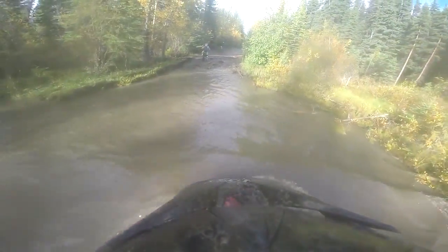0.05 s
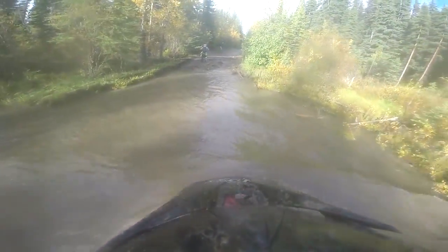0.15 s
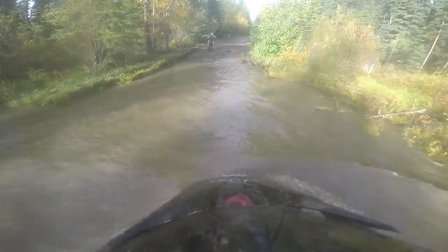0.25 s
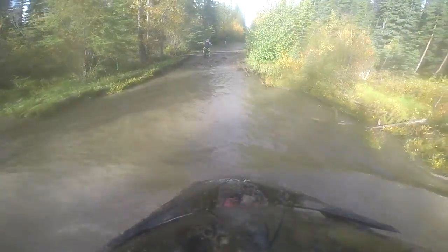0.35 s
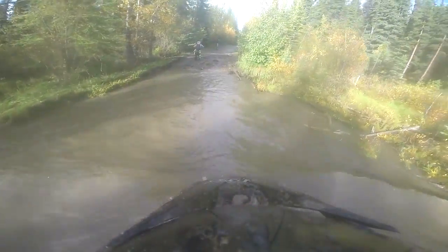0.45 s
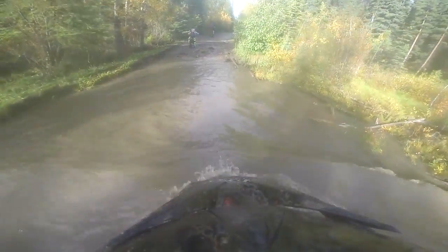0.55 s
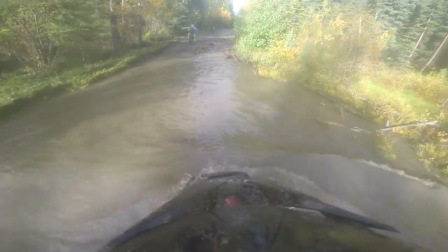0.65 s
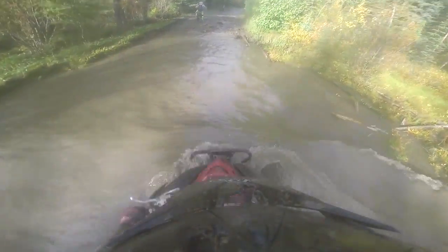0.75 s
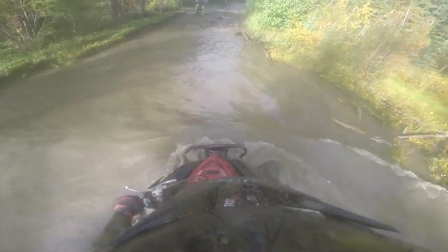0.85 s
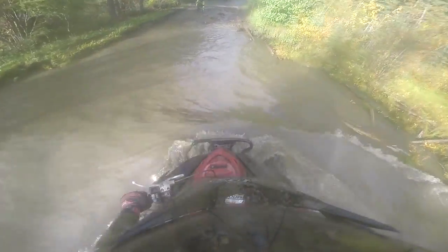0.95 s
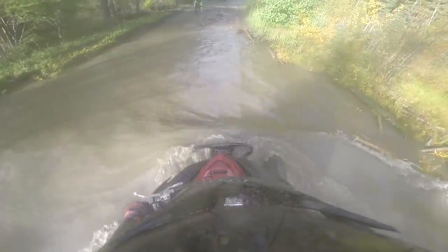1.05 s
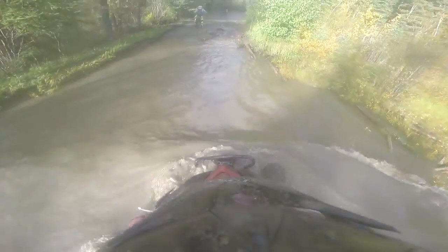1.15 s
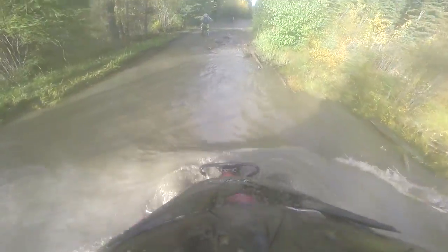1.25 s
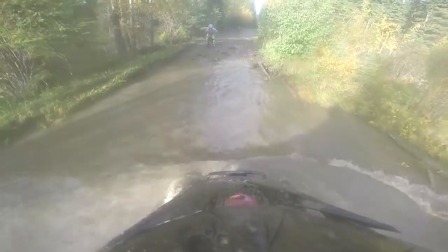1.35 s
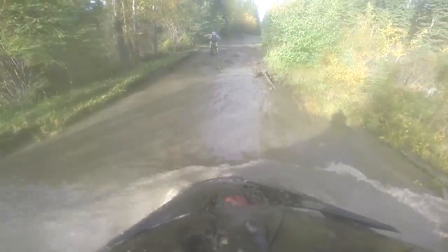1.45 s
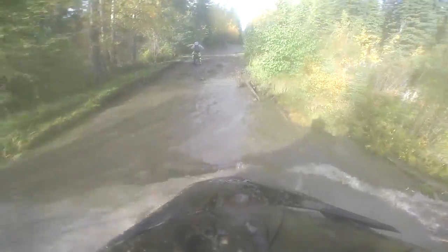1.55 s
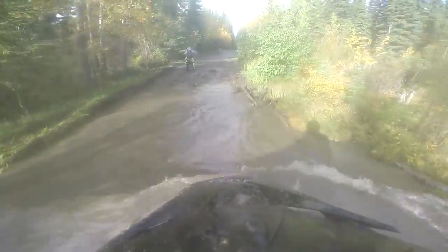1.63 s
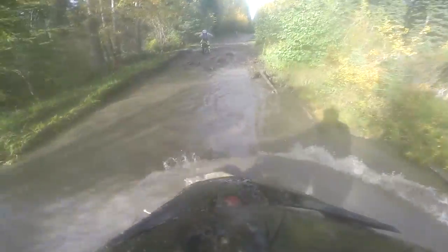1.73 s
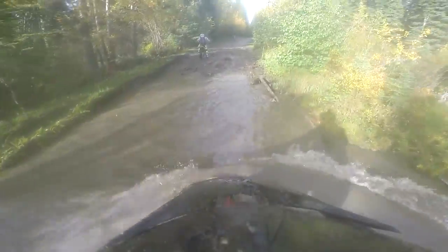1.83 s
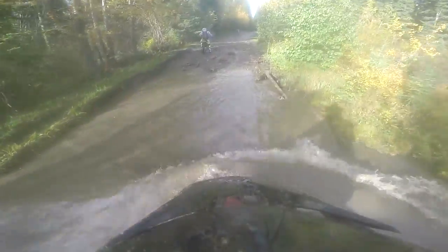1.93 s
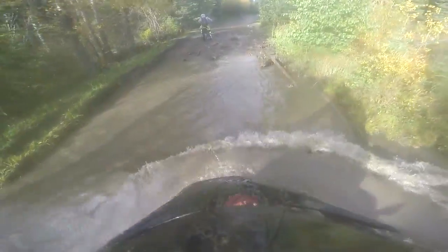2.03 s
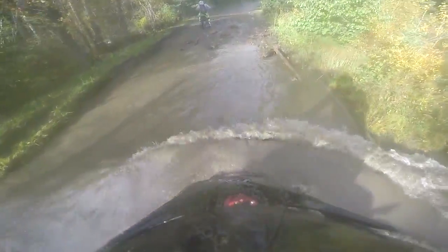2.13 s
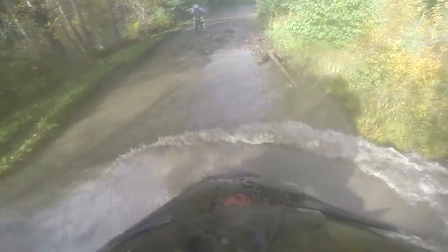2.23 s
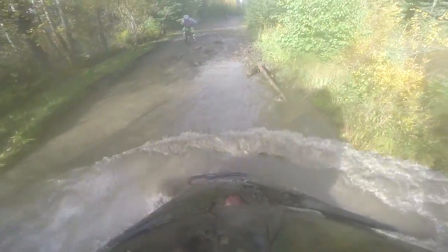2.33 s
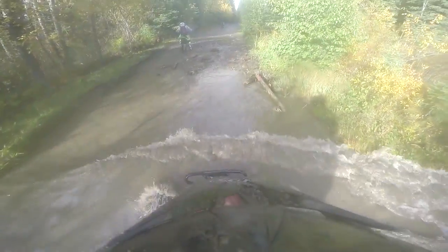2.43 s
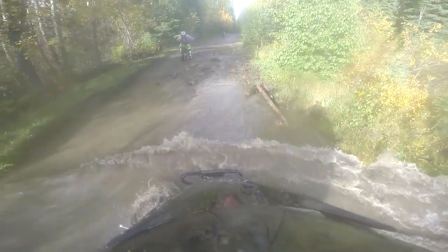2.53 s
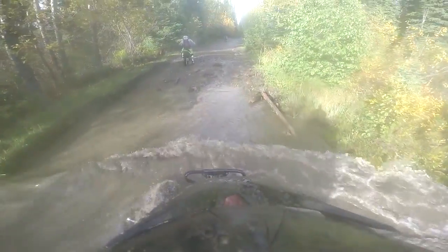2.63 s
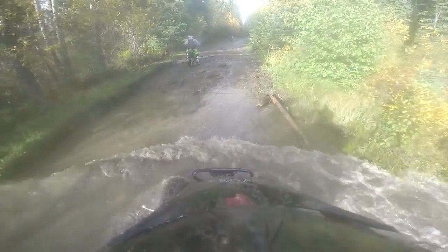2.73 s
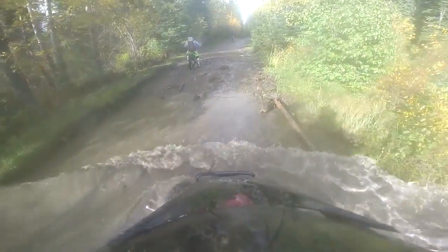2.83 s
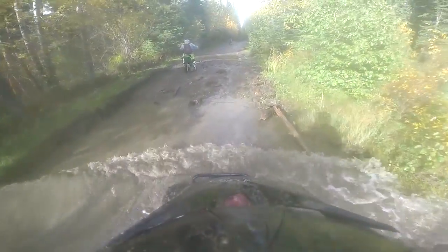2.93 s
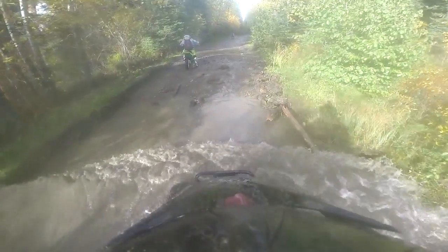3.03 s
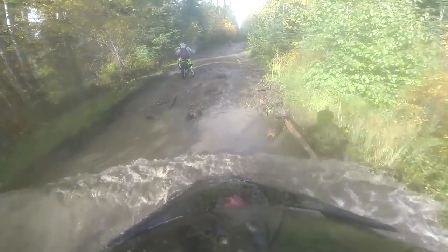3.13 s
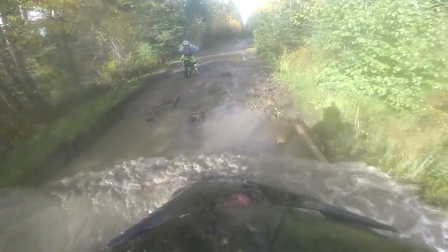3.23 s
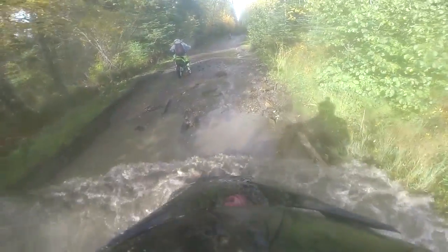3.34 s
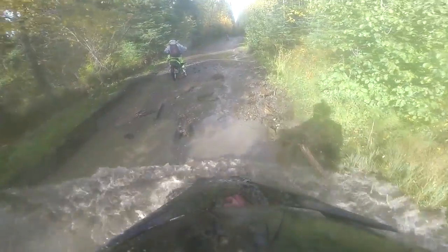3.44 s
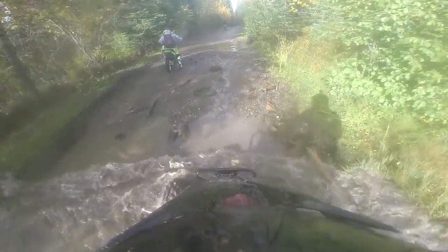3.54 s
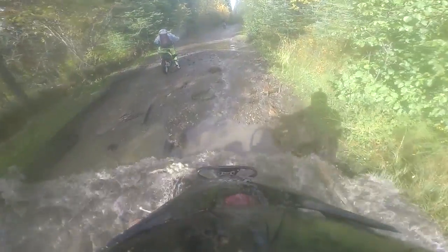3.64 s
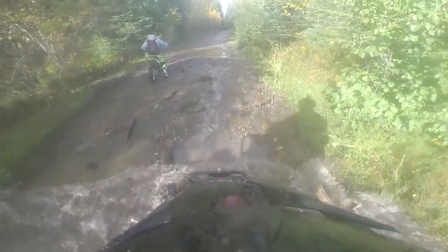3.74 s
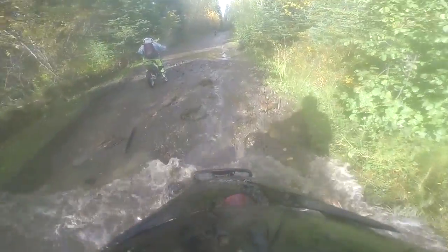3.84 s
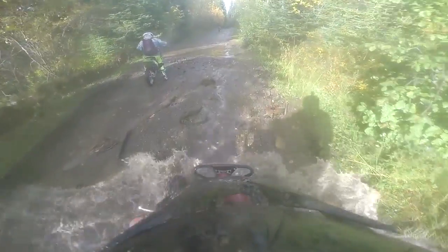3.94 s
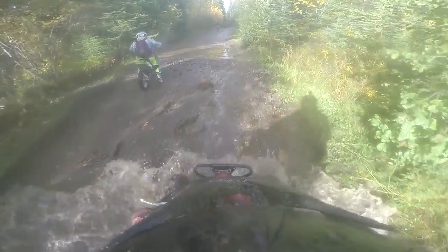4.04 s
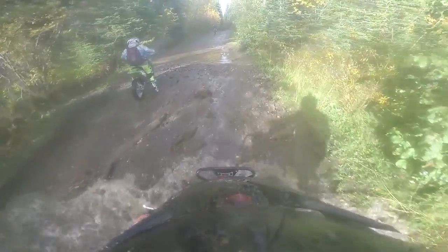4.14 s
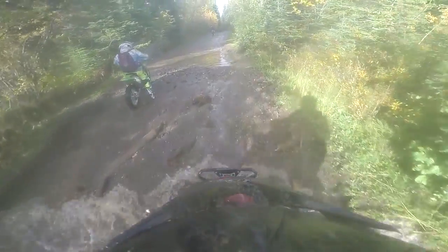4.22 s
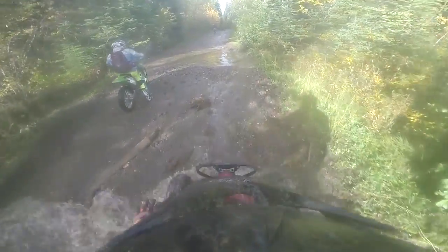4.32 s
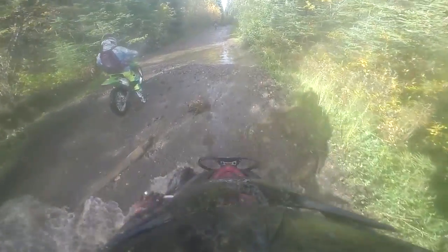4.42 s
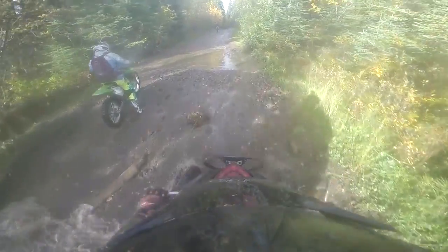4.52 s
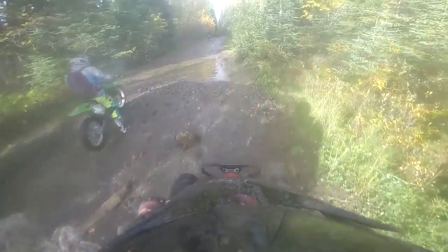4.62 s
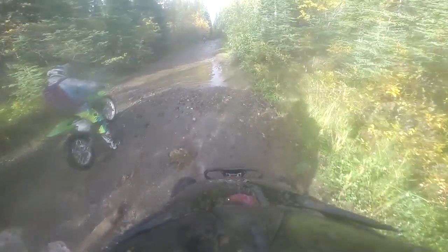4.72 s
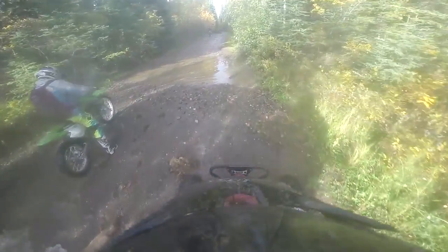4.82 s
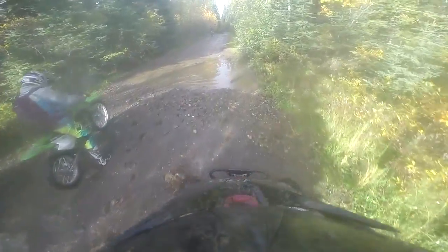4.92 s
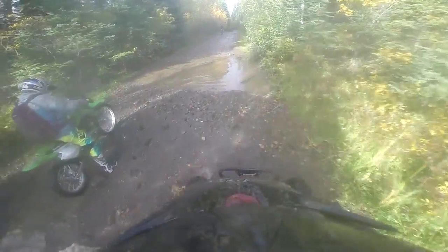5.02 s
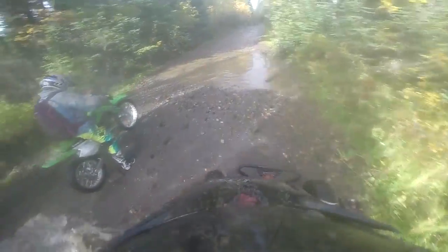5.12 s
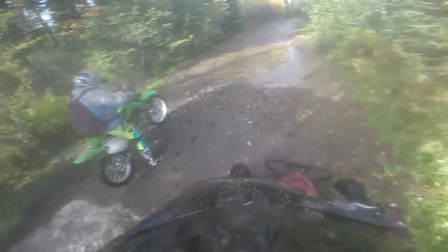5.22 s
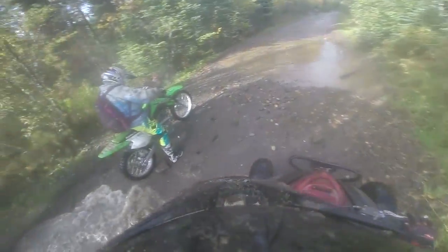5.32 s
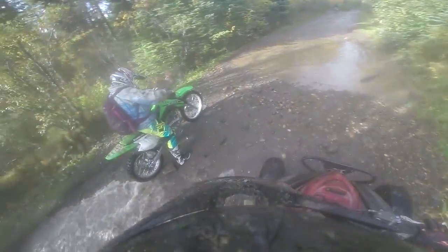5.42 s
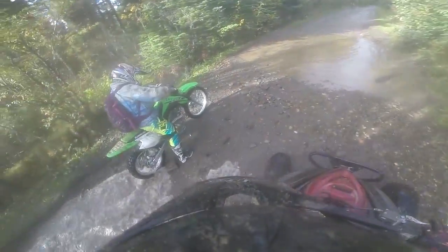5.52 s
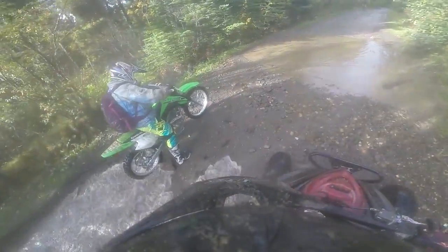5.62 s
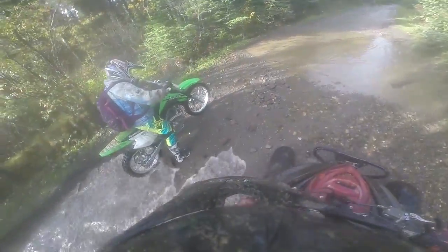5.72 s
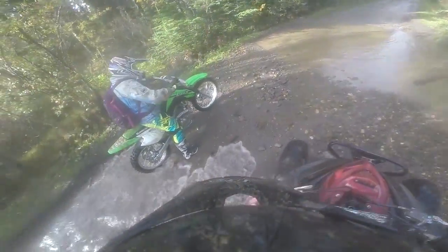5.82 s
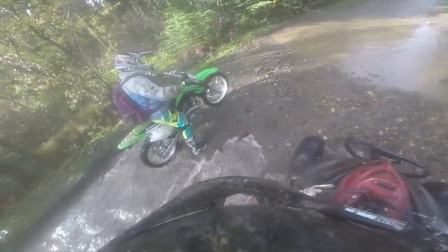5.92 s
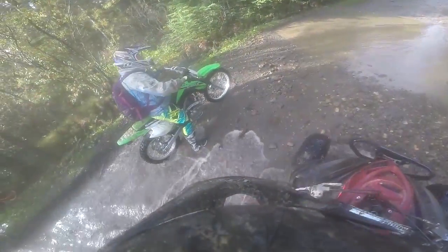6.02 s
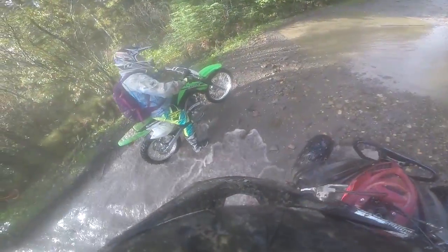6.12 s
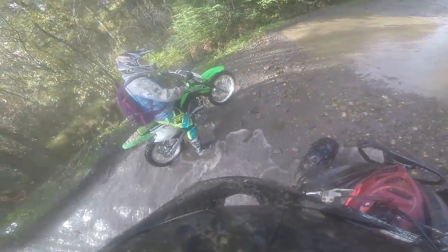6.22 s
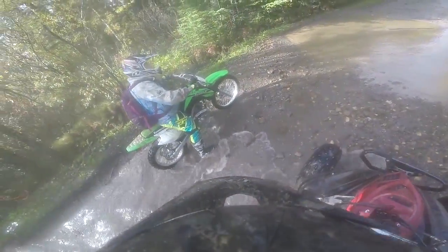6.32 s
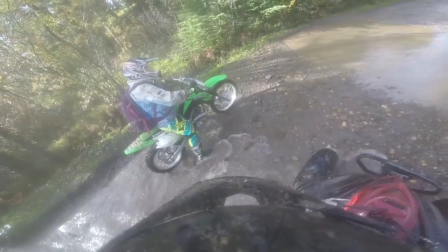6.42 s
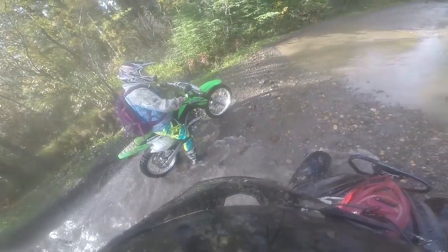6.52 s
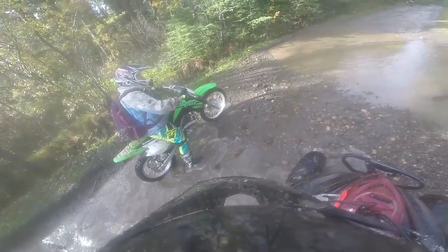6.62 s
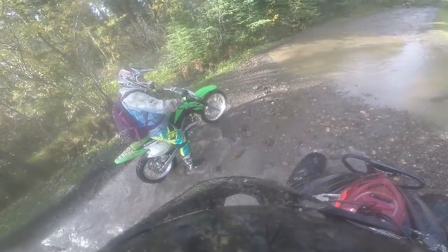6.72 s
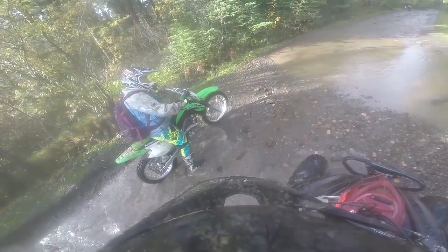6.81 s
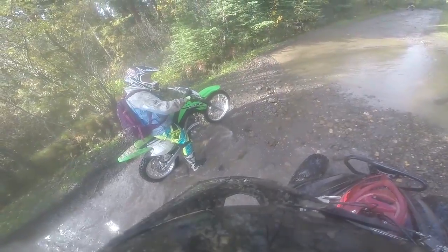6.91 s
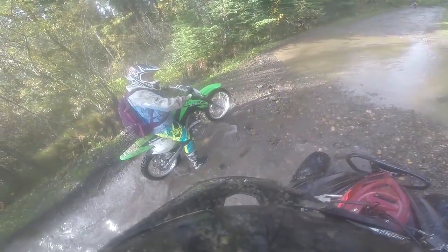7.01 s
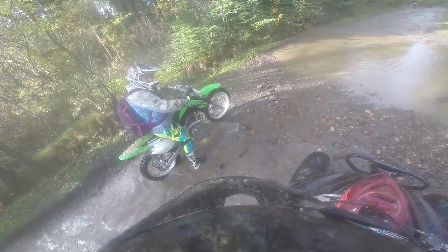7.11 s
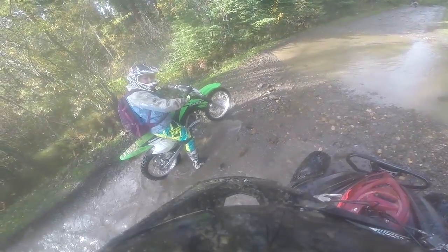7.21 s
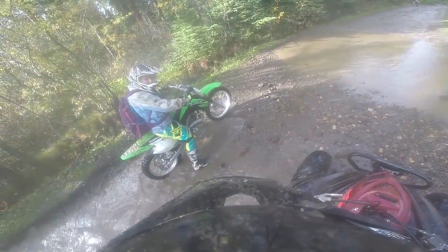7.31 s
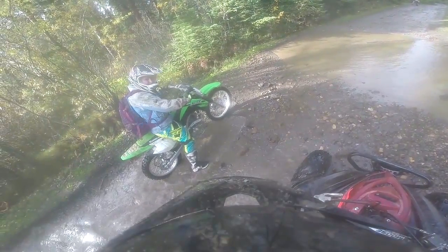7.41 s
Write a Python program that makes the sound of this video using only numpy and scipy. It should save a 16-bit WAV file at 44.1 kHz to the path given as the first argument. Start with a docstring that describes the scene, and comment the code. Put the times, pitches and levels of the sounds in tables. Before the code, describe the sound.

Boomy quad engine wades a forest puddle amid churning spray and bumps, climbs out, shuts throttle and settles into a slow putter beside soft chuffing.

```python
"""A single-cylinder quad bike wades through a long forest puddle, climbs out and drops to idle, heard at the helmet.
From the start each firing booms in the pipe, barks in the intake and rattles the engine case,
while coloured noise makes churning water and low buffeting; knocks, splashes and a few drips come in between.
The throttle shuts on the way out and the engine settles to a short thud, with a whirr between firings.
At the end something close by chuffs about six times a second, each chuff a short burst of noise."""
import sys
import numpy as np
from scipy import signal
from scipy.fft import rfft, irfft
from scipy.io import wavfile
from scipy.ndimage import uniform_filter1d

SR = 44100
rng = np.random.default_rng(int(sys.argv[2]) if len(sys.argv) > 2 else 0)


def master_out(mix):
    """Clip the mix to full scale and print it as 16-bit PCM to the path in sys.argv[1]."""
    frames = np.transpose(np.atleast_2d(mix))
    ceiling = np.clip(frames, -1, 1)
    pcm = np.round(ceiling * 32767).astype(np.int16)
    wavfile.write(sys.argv[1], SR, pcm)


N = 328986
TIME = np.arange(N) / SR

# how fast the engine fires: t/s, firings per second
FIRING_RATE = [(0.0, 16.8), (0.25, 16.33), (0.45, 19.26), (0.9, 18.12), (1.18, 21.05), (1.35, 18.95),
               (1.6, 22.19), (1.7, 17.23), (2.06, 13.53), (2.25, 26.98), (2.77, 19.3), (3.3, 18.47),
               (3.4, 21.38), (3.85, 24.09), (3.95, 21.16), (4.04, 23.25), (4.5, 24.7), (4.78, 14.29),
               (5.44, 12.89), (5.67, 13.36), (7.15, 13.73), (7.46, 13.21)]
# how hard the engine works, high in the puddle, then down to idle with one short push: t/s, load (0-1)
ENGINE_LOAD = [(0, 0.89), (.6, 0.8), (1.0, 1), (1.5, 0.82), (2.0, 0.79), (2.22, 0.91), (2.6, 0.98),
               (2.78, 0.84), (3.4, 0.92), (4.45, 0.89), (4.7, 0.59), (5.1, 0.5), (5.27, 0.82), (5.55, 0.33),
               (7.46, 0)]
# the throttle snaps shut and the exhaust's bark dips: middle t/s, length/s, level/dB
THROTTLE_SHUT = [(2.0, 0.17, -7.5), (4.794, 0.38, -26)]
# the throttle is wrenched open and the intake barks harder: middle t/s, length/s, level/dB
HARD_PULLS = [(2.42, 0.43, 3.5)]
PULL_SHARE = 0.35  # share of that swell, in dB, which the growl and the engine case follow
IDLE_PER_S = 13.5  # firings per second at which revs add nothing to a sound's level

# Each ..._law below lists: level/dB with no load at IDLE_PER_S, dB added by full load, dB added per octave of revs.
# Levels in spectra are relative: only their shape counts, as the sound is scaled afterwards.


def exhaust(turns):
    """Each firing rings the pipe and silencer: long and boomy under load, a short thud at idle."""
    # what one firing passes through, under load and at idle: f/Hz, level/dB
    loaded_pipe, idle_pipe = [(20, -36), (45, -2), (62, -32), (85, -2.5), (102, 2), (114, 8), (126, -0.5),
                              (150, -15), (205, -18), (250, -45), (400, -26), (900, -63.5)], [(20, -109), (40, -8), (58, 0.5), (85, -0.5), (108, 2),
                                            (130, -15.5), (170, -33), (250, -18.5), (400, -76), (900, -52)]
    loaded_silencer, idle_silencer = [(60, -9), (150, 0), (195, 2), (225, 12.5), (265, -1.5), (330, 0.5),
                                      (390, 3), (450, -18), (600, -18), (1500, -47.5)], [(60, -44), (150, -42), (205, -1.5),
                                                               (265, 6.5), (300, 8.5), (335, -0.5),
                                                               (385, -5), (430, -37), (600, -53),
                                                               (1500, -62)]
    # how the boom and the growl grow with effort
    boom_law, growl_law = (-43, 9.75, -0.6), (-46.5, 4.5, 0.39)
    # the pipe's boom briefly swells or sags: middle t/s, length/s, level/dB
    boom_swells = [(.95, 0.38, 3.5), (1.65, 0.18, -3.5), (2.4, 0.26, 3.5), (3.63, 0.11, 3.5),
                   (4.13, 0.1, 3)]

    load = np.clip(curve(ENGINE_LOAD), 0, 1)
    blows = strokes(turns, at=0.265, uneven_db=1.15)
    # no two burns are alike
    blows = blows + 0.38 * np.sqrt(load) * puffs(blows, rise=0.004, decay=0.05)
    boom = sounded(blows * load, resonator(loaded_pipe))
    thud = sounded(blows * (1 - load), resonator(idle_pipe))
    pipe = -(boom + amp(4.0) * thud) * effort(boom_law) * swells(boom_swells)
    pipe = pipe * swells(THROTTLE_SHUT) ** 0.23  # the boom takes only part of the dip
    pipe = pipe * amp(1.0 * load * drift(hz=4.4))

    firing = strokes(turns, at=0.29, uneven_db=0.5)
    turbulence = 0.38 * puffs(firing, rise=0.002, decay=0.022)
    gas = turbulence - echoed(firing, delay=0.01138, gain=0.49)
    growl = sounded(gas * load, resonator(loaded_silencer))
    putter = sounded(gas * (1 - load), resonator(idle_silencer))
    bark = (amp(-1.5) * growl + amp(-1.0) * putter) * effort(growl_law)
    return pipe + bark * swells(THROTTLE_SHUT) * swells(HARD_PULLS) ** PULL_SHARE


def intake(turns):
    """A double gulp with each firing; as the revs rise the second gulp grows and the airbox drones."""
    # what the gulps pass through, for the bark and for the drone: f/Hz, level/dB
    throat, airbox = [(150, -32), (215, -20), (300, -20), (390, -6.5), (460, 2), (545, 10), (610, -7.5),
                      (700, -11), (850, -4), (1200, -13), (2500, -77)], [(300, -36), (480, -16), (545, 0), (580, 4), (615, -1.5), (670, -5.5),
                                      (760, -8.5), (1500, -61.5)]
    # how the intake grows with effort
    intake_law = (-57, 3.8, 9.9)
    second_gulp = 0.36  # how far the second gulp follows the first, in cycles

    revs = curve(FIRING_RATE) / 23
    load = np.clip(curve(ENGINE_LOAD), 0, 1)
    drone_share = np.clip(0.6 * revs ** 5, 0, 0.65)
    gulps = strokes(turns, at=0.32, uneven_db=-0.3)
    rush = 0.3 * puffs(gulps, rise=0.001, decay=0.006)
    air = echoed(gulps, delay=second_gulp / curve(FIRING_RATE), gain=0.5 * revs ** 3) + rush
    bark = sounded(air, resonator(throat)) * np.sqrt(1 - drone_share) * (0.34 + 0.5 * load)
    drone = sounded(air, resonator(airbox)) * np.sqrt(drone_share)
    return (amp(-1.0) * bark + drone) * effort(intake_law)


def clatter(turns, ring_s=0.0087, size=2500):
    """The engine case rattles after each firing; between beats, water churns or the idling gears whirr."""
    # share of the clatter that comes in beats: t/s, share (0-1)
    beat_share = [(0, 0.44), (1.3, 0.45), (1.85, 0), (2.5, 0.47), (3.1, 0.36), (4.6, 0.01)]
    # spectra of the rattling case, the churning water and the whirring gears: f/Hz, level/dB
    case_spectrum, churn_spectrum, whirr_spectrum = [(410, -29), (700, -6), (1070, -9.5), (1230, 1.5),
                                                     (1450, 2.5), (1670, -6), (1930, 3.5), (2140, -8),
                                                     (2370, -3), (2800, -9), (3030, -5), (3690, -21),
                                                     (4000, -44.5), (5200, -55), (8800, -120)], [(410, -36), (700, -8), (958, -8.5),
                                                                   (1490, 5), (1750, -1.5), (1870, 1.5),
                                                                   (2060, -4), (2380, 0), (2700, -6.5),
                                                                   (3190, -7), (3610, -21), (4000, -13),
                                                                   (5200, -28), (8800, -120)], [(410, -13), (700, -6.5),
                                                                                  (737, -13.5), (993, -2.5),
                                                                                  (1140, -3.5), (1460, 1.5),
                                                                                  (1930, -5), (2300, -1.5),
                                                                                  (2700, -9.5), (2900, -5),
                                                                                  (3380, -13.5),
                                                                                  (3770, -24),
                                                                                  (4000, -11.5),
                                                                                  (5200, -13), (8800, -120)]
    # how the clatter grows with effort
    clatter_law = (-49.5, 10.2, 1.92)

    beats = np.clip(curve(beat_share), 0, 1)
    load = np.clip(curve(ENGINE_LOAD), 0, 1)
    blows = strokes(turns, at=0.37, uneven_db=1.07)
    # many close modes that answer every blow alike
    case = rng.standard_normal(size) * np.exp(-TIME[:size] / ring_s)
    rattle = colour(0.5 * sounded(blows, case) + puffs(blows, rise=0.004, decay=0.0094), case_spectrum)
    splashing = noise() + 0.36 * drops(per_s=700, spread_db=2.5)
    churn = colour(splashing * amp(0.78 * drift(hz=25)), churn_spectrum)
    whirr = colour(noise() * amp(2.3 * drift(hz=44.5)), whirr_spectrum)
    steady = amp(0.48) * np.sqrt(load) * churn + amp(0.96) * np.sqrt(1 - load) * whirr
    return (amp(0.2) * np.sqrt(beats) * rattle + np.sqrt(1 - beats) * steady) * effort(clatter_law)


def coasting(turns):
    """With the throttle shut, a low engine hum sags with the falling revs."""
    full_db, full_fall = -33, 1.9  # top level in dB, and the fall in octaves a second that gives it
    hum_order = 5  # cycles of the hum in each firing
    fall = -np.gradient(np.log2(curve(FIRING_RATE))) * SR
    falling = np.clip(fall / full_fall, 0, 1)
    shut = abs(1 - swells(THROTTLE_SHUT))
    loudness = uniform_filter1d(np.sqrt(falling * shut), size=2000)
    return amp(full_db) * loudness * np.sin(2 * np.pi * hum_order * turns)


def water(turns, count=24):
    """Spray fizzes with droplets and pulses a little with the engine; the wheels slosh lower down."""
    # spectra of the spray and the slosh: f/Hz, level/dB
    spray_spectrum, slosh_spectrum = [(2120, -38), (3600, -10), (3750, -15), (4340, -0.5), (4920, -3.5),
                                      (5280, -2), (7990, -19.5), (9620, -18.5), (10800, -24.5),
                                      (14500, -29), (15100, -32)], [(50, -34), (80, 9.5), (160, 3.5), (250, -2.5),
                                                     (400, -1.5), (480, -10), (600, -8.5), (850, -19),
                                                     (1200, -28)]
    # how the spray and the slosh grow with effort
    spray_law, slosh_law = (-48.5, 1.56, 1.23), (-49.5, 3.9, 7.2)
    # water thrown up, as the bow wave builds and then drains off on the bank: t/s, level/dB
    wake = [(0, -2), (1.7, -.5), (2.25, 3), (2.7, 0.5), (4.4, 3.5), (5.05, -0.5), (5.35, 3), (5.8, -2.5),
            (7.46, -6)]
    # the front ploughs into its own bow wave and the slosh swells: middle t/s, length/s, level/dB
    surges = [(.1, 0.24, 4), (2.35, 0.62, 2), (3.05, 0.78, 4), (4.35, 0.37, 3)]

    pitches = np.geomspace(2800, 12000, count)
    patter = unit(sum(sounded(drops(per_s=22, spread_db=2.5), droplet(hz)) for hz in pitches))
    shakes = strokes(turns, at=0.17, uneven_db=2.5)
    pulses = np.sqrt(abs(curve(ENGINE_LOAD))) * puffs(shakes, rise=0.0063, decay=0.033)
    fizz = noise() + 0.23 * patter + 0.7 * pulses
    spray = colour(fizz * amp(0.52 * drift(hz=25)), spray_spectrum) * effort(spray_law) * amp(curve(wake))
    slosh = colour(noise() * amp(2.4 * drift(hz=19)), slosh_spectrum) * effort(slosh_law) * swells(surges)
    return spray + slosh


def slaps_and_cracks():
    """Water slaps the bodywork, and two knocks crack; each is a short burst of noise."""
    # the slaps and cracks: t/s, level/dB before the 3 dB lift below, length/s
    hits = [(1.781, -38, 0.0032), (2.156, -36.5, 0.041), (2.2, -30, 0.012), (2.212, -23, 0.006),
            (2.226, -29, 0.011), (2.4, -43, 0.0034), (2.443, -30, 0.0063), (4.466, -31, .004),
            (5.197, -39, 0.013)]
    # their spectrum: f/Hz, level/dB
    hit_spectrum = [(300, 9), (700, -3), (1400, 2.5), (2000, 2), (2900, -1.5), (3500, -3), (4500, -30),
                    (7000, -16), (15000, -56)]
    return amp(3.0) * bursts(hits, hit_spectrum, grit_db=4, vary_db=1.5)


def drips():
    """Single drops land near the helmet, each a short chirp."""
    # the drops: t/s, starting pitch f/Hz, level/dB
    landings = [(4.756, 2780, -30.5), (4.934, 6500, -42), (5.719, 6470, -40), (6.051, 5060, -36.5),
                (6.163, 5100, -35.5)]
    out = np.zeros(N)
    for s, hz, db in landings:
        drop = amp(db) * droplet(hz)
        at = round(s * SR)
        out[at:at + len(drop)] += drop
    return out


def knocks():
    """Jolts and flung drops strike the housing, a plastic tick over a low thump; bumps leave the bodywork humming."""
    # knocks on the microphone's housing: t/s, thump level/dB, tick level/dB
    hits = [(0.083, -18, -36), (1.783, -7.5, -14.5), (2.11, -13.5, -40), (2.216, -32, -6.5),
            (2.444, -43, -13), (2.83, -9.5, 0.5), (3.283, -19, -31), (4.216, -34, -37), (4.466, -13.5, -19),
            (5.2, -28, -35)]
    # bumps that set the bodywork humming: t/s, level/dB
    bumps = [(5.206, -21), (5.971, -26.5)]
    # how thump, tick and bodywork ring: f/Hz, level/dB, time to fall by 60 dB/s
    thump_modes, tick_modes, body_modes = [(120, 0, .085), (152, -20, .05), (350, -10, .03),
                                           (410, -10, .03), (900, -19, .012)], [(1340, -12.5, 0.0092), (1446, -9, 0.019),
                                                          (2306, -20.5, 0.022), (2490, -2, 0.0049)], [(107.2, 0, 0.52)]

    s, thump_db, tick_db = np.transpose(hits)
    thumps = struck(s, thump_db, ring(thump_modes, rise=0.004))
    ticks = struck(s, tick_db, ring(tick_modes, rise=0.00096))
    hum = struck(*np.transpose(bumps), ring(body_modes, rise=0.023, size=20000))
    return thumps + ticks + hum


def chuffs():
    """Something close by chuffs about six times a second, in short bursts of gritty noise."""
    # the chuffs: t/s, level/dB before the 1 dB lift below, length/s
    chuff_times = [(5.715, -48, 0.023), (5.888, -41.5, 0.032), (6.092, -39.5, .02), (6.274, -37, 0.014),
                   (6.444, -38, 0.016), (6.611, -39, 0.014), (6.777, -37.5, 0.013), (6.944, -40.5, 0.02),
                   (7.107, -37.5, 0.016), (7.278, -42, 0.018), (7.445, -39, 0.014)]
    # their spectrum: f/Hz, level/dB
    chuff_spectrum = [(600, -30), (1200, -8.5), (2200, -5.5), (2900, 2), (3600, -14.5), (4400, 5),
                      (5300, -1.5), (7500, -14.5), (9500, -14), (12000, -24.5), (15000, -33)]
    return amp(1.0) * bursts(chuff_times, chuff_spectrum, grit_db=3.4, vary_db=1.8, rise=0.003)


def buffeting():
    """Lumpy low rumble from air and jolts on the helmet."""
    # spectrum of the rumble: f/Hz, level/dB
    wind_spectrum = [(5, -13.5), (14, 11), (22, 3.5), (32, -22), (48, -3), (70, -52), (140, -46),
                     (400, -83)]
    # its strength, around which it wavers: t/s, level/dB
    strength = [(0, -29.5), (.28, -21), (1.0, -40.5), (1.8, -29), (2.7, -34.5), (3.2, -26), (3.55, -33),
                (4.4, -33), (5.8, -42.5), (7.46, -47.5)]
    return colour(noise(), wind_spectrum) * amp(curve(strength) + 0.57 * drift(hz=9.8))


def strokes(turns, at, uneven_db):
    """One click a cycle at the given point of it, of uneven strength; mean power about 1."""
    fired = np.diff(np.floor(turns - at), prepend=np.floor(turns[0] - at))
    return fired * np.sqrt(SR / curve(FIRING_RATE)) * amp(uneven_db * noise())


def puffs(clicks, rise, decay, size=4000):
    """A short burst of noise after each click, with rise and decay in seconds."""
    t = TIME[:size]
    shape = ((1 - np.exp(-t / rise)) * np.exp(-t / decay)) ** 2
    power = abs(signal.oaconvolve(clicks ** 2, shape / shape.sum())[:N])
    return np.sqrt(power) * noise()


def effort(law):
    """Gain of a sound that changes with the load and the revs."""
    idle_db, load_db, octave_db = law
    octaves = np.log2(curve(FIRING_RATE) / IDLE_PER_S)
    return amp(idle_db + load_db * curve(ENGINE_LOAD) + octave_db * octaves)


def swells(events):
    """Gain that is 1 except for a smooth swell or dip at each event."""
    return amp(sum(db * np.exp(-(2 * (TIME - s) / length) ** 4) for s, length, db in events))


def resonator(spectrum, size=16384):
    """The ringing of a body with this spectrum, starting at the blow; above the last point it falls away."""
    hz, db = np.transpose(spectrum)
    f = abs(np.fft.fftfreq(size, 1 / SR))
    gain = amp(np.interp(np.log(f + 1), np.log(hz + 1), db)) / np.maximum(f / hz[-1], 1) ** 2
    # the Hilbert transform finds the phase that puts no sound ahead of the blow
    response = np.fft.ifft(np.exp(np.conj(signal.hilbert(np.log(gain))))).real
    return response[:size // 2]


def sounded(drive, response):
    """Passes a drive through a response scaled to energy 1."""
    return signal.oaconvolve(drive, response / np.linalg.norm(response))[:N]


def echoed(x, delay, gain):
    """x and one reflection of it after delay seconds, scaled to keep about the same power."""
    return (x + gain * np.interp(TIME - delay, TIME, x, left=0)) / np.sqrt(1 + gain ** 2)


def ring(modes, rise=0.001, size=11000):
    """The sum of dying tones after one blow that builds up over rise seconds."""
    t = TIME[:size]
    tones = sum(amp(db - 60 * t / t60) * np.sin(2 * np.pi * hz * t) for hz, db, t60 in modes)
    return tones * (1 - np.exp(-t / rise))


def struck(s, db, response):
    """A response set off at the given times and levels."""
    blows = np.zeros(N)
    blows[np.round(s * SR).astype(int)] = amp(db)
    return signal.oaconvolve(blows, response)[:N]


def bursts(events, spectrum, grit_db, vary_db, rise=0.0024, size=6000):
    """Short bursts of gritty noise, each with a slightly different colour."""
    hz, spectrum_db = np.transpose(spectrum)
    t = TIME[:size]
    out = np.zeros(N + size)
    for s, db, length in events:
        grit = unit(uniform_filter1d(rng.standard_normal(size), 60))
        grains = rng.standard_normal(size) * amp(grit_db * grit)
        varied_db = spectrum_db + vary_db * rng.standard_normal(len(hz))
        body = resonator(np.c_[hz, varied_db], size=1024)
        envelope = (1 - np.exp(-t / rise)) * np.exp(-(t / length) ** 2 / 2)
        at = round(s * SR)
        out[at:at + size] += amp(db) * envelope * unit(signal.oaconvolve(grains, body)[:size])
    return out[:N]


def drops(per_s, spread_db):
    """Sparse random clicks, some much larger than the rest, at rms 1."""
    sizes = amp(spread_db * np.minimum(rng.exponential(1, N), 3))
    return unit((rng.random(N) < per_s / SR) * noise() * sizes)


def droplet(hz, life=0.00097, size=600):
    """The short upward chirp of one drop, loudest after life seconds."""
    t = TIME[:size]
    return t / life * np.exp(1 - t / life) * np.sin(2 * np.pi * hz * t * (1 + 9 * t))


def colour(x, spectrum):
    """Filters x by a spectrum and scales it to rms 1."""
    hz, db = np.transpose(spectrum)
    f = np.fft.rfftfreq(N, 1 / SR)
    gain = amp(np.interp(np.log(f + 1), np.log(hz + 1), db, right=-100))
    return unit(irfft(rfft(x) * gain, N))


def noise():
    """White noise."""
    return rng.standard_normal(N)


def drift(hz):
    """Slow random wavering up to about hz, rms 1."""
    f = np.fft.rfftfreq(N, 1 / SR)
    return unit(irfft(rfft(noise()) / (1 + (f / hz) ** 4), N))


def curve(rows):
    """A table of (time, value), joined by straight lines at every sample."""
    return np.interp(TIME, *np.transpose(rows))


def amp(db):
    """Decibels to gain."""
    return 10 ** (np.asarray(db) / 20)


def unit(x):
    """Scales to rms 1."""
    return x / np.sqrt(np.mean(x ** 2) + 1e-20)


def scene():
    """One crankshaft drives all the engine's sounds; water, chuffs, air and knocks are added."""
    turns = np.cumsum(curve(FIRING_RATE)) / SR  # firing cycles so far
    pull = swells(HARD_PULLS)
    engine = exhaust(turns) + intake(turns) * pull + clatter(turns) * pull ** PULL_SHARE + coasting(turns)
    puddle = water(turns) + drips() + slaps_and_cracks()
    return (engine + puddle + chuffs() + buffeting() + knocks())[None]


def record(dry):
    """The recorder's band limit: a steep filter takes away the highest treble."""
    edge_hz = 15250
    lowpass = signal.firwin(511, edge_hz, window=("kaiser", 9), fs=SR)
    return signal.oaconvolve(dry, lowpass[None], "same")


dry = scene()
out = record(dry)
master_out(out)
```